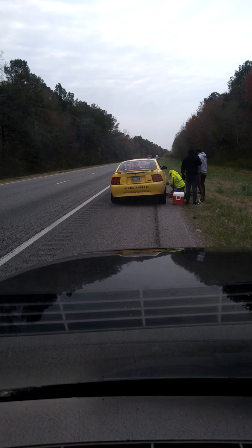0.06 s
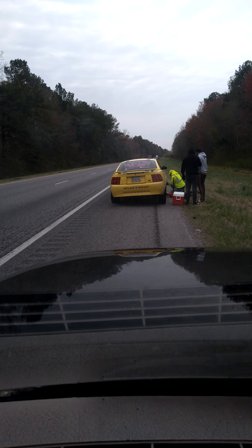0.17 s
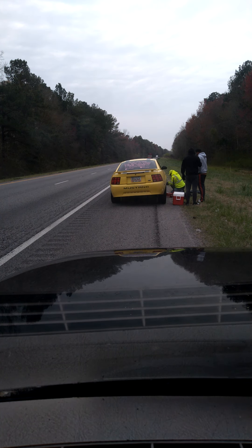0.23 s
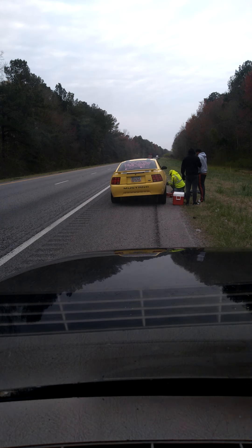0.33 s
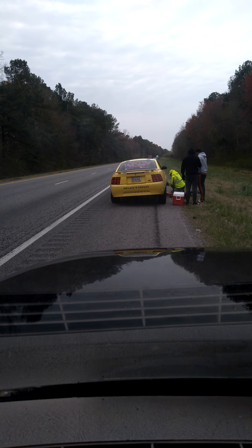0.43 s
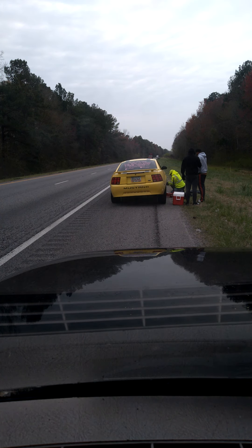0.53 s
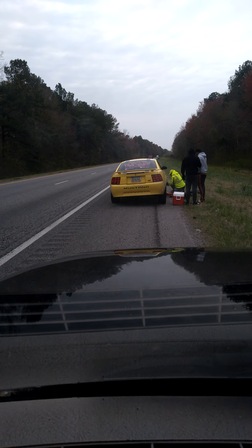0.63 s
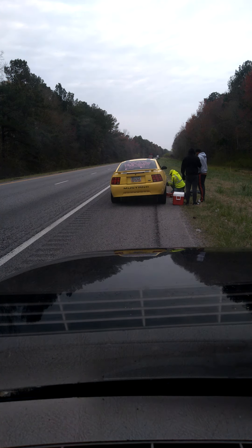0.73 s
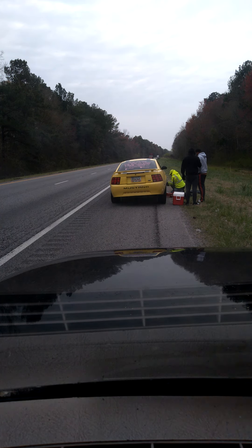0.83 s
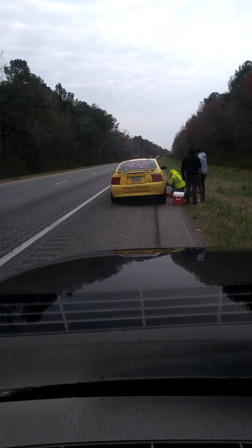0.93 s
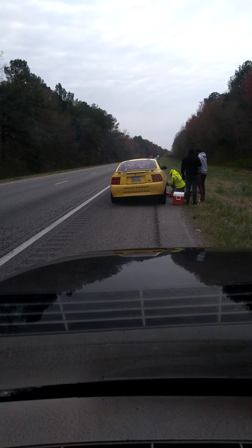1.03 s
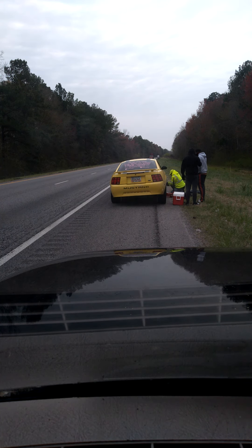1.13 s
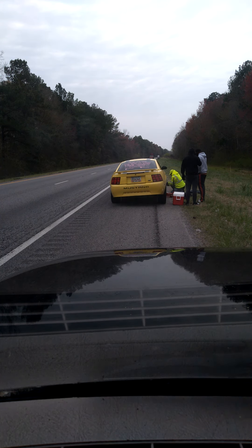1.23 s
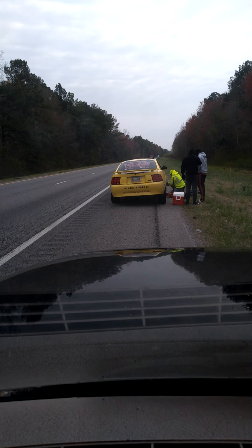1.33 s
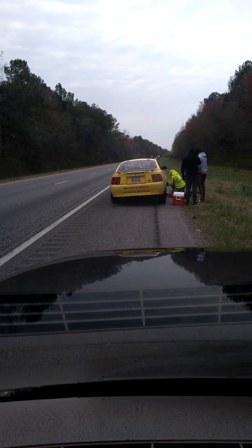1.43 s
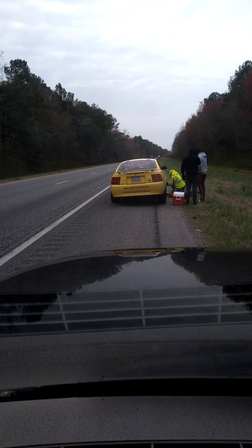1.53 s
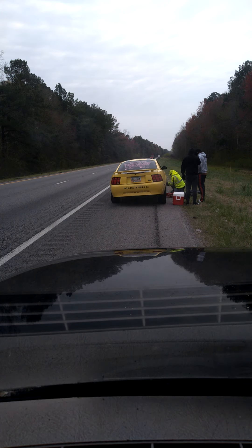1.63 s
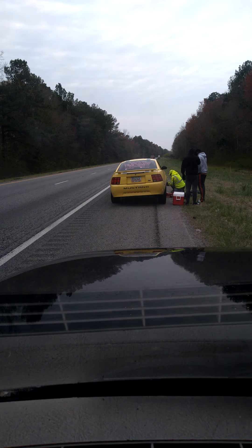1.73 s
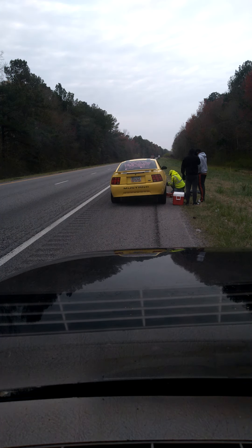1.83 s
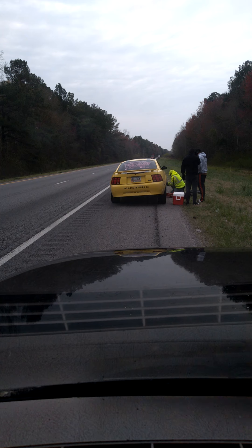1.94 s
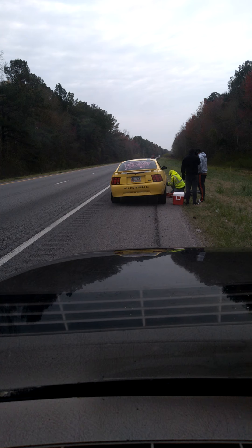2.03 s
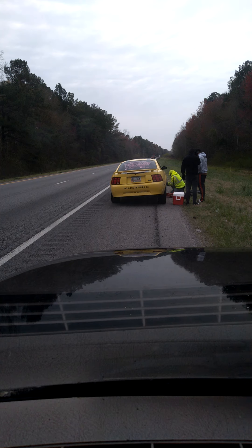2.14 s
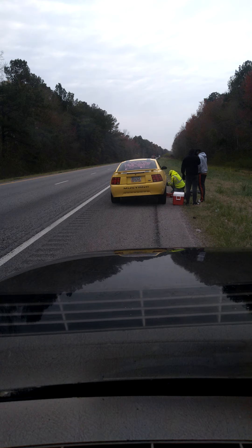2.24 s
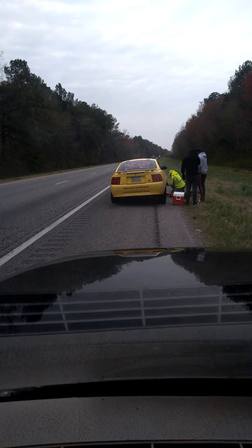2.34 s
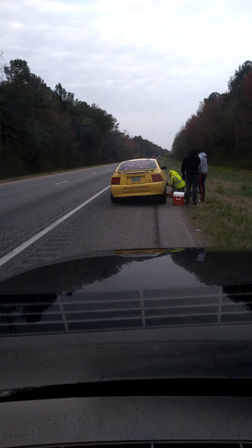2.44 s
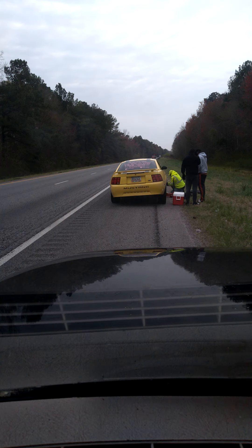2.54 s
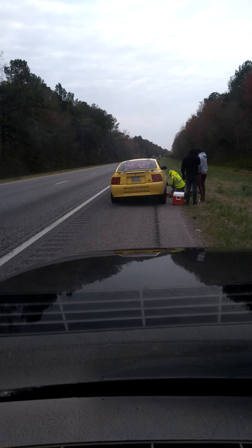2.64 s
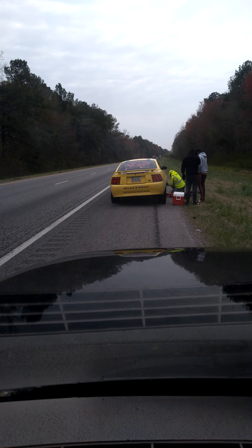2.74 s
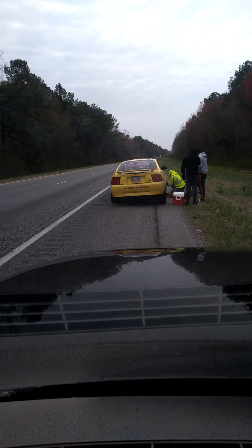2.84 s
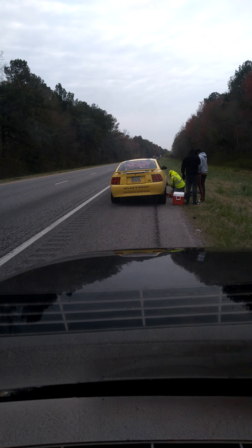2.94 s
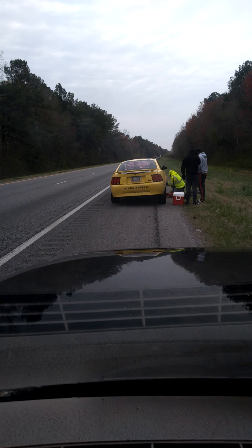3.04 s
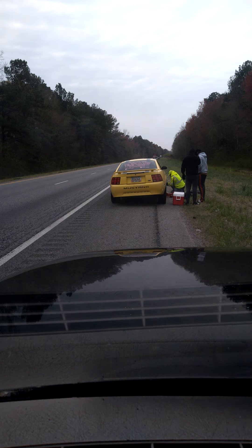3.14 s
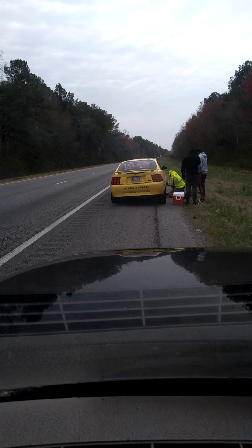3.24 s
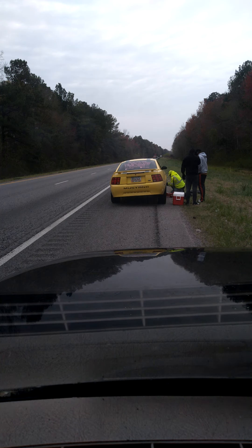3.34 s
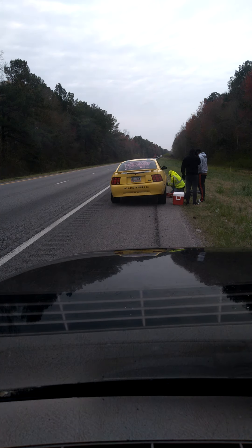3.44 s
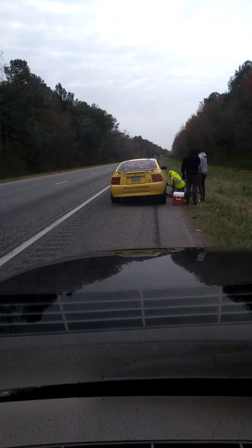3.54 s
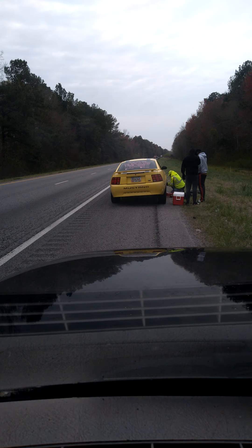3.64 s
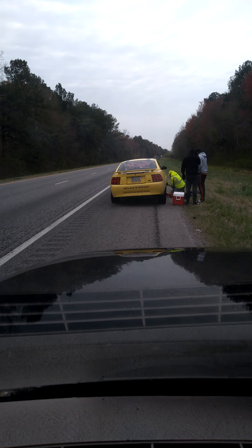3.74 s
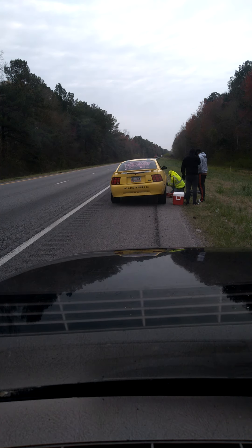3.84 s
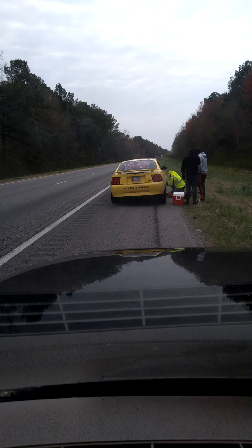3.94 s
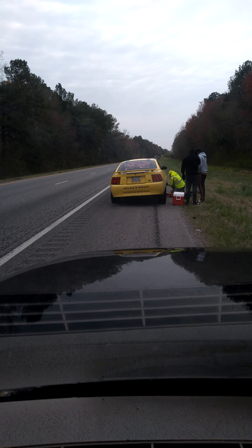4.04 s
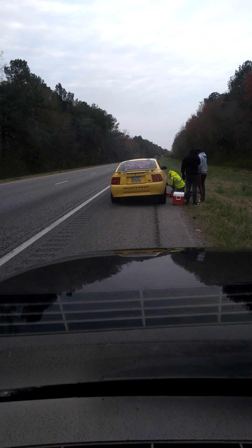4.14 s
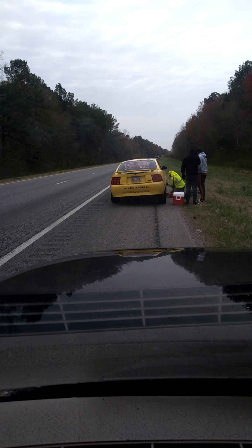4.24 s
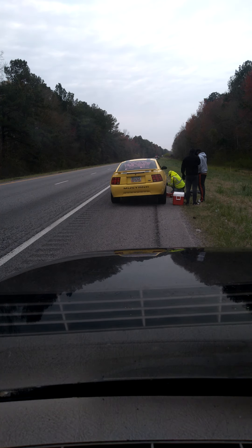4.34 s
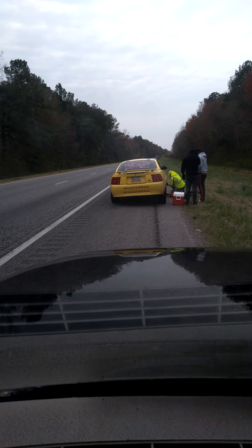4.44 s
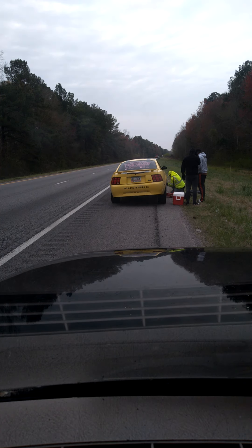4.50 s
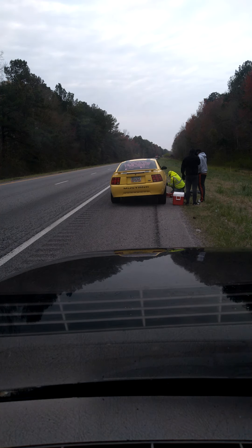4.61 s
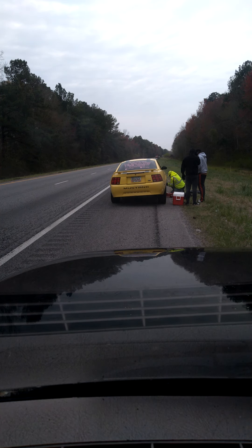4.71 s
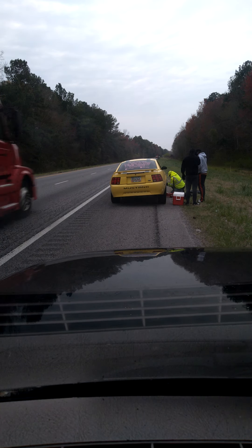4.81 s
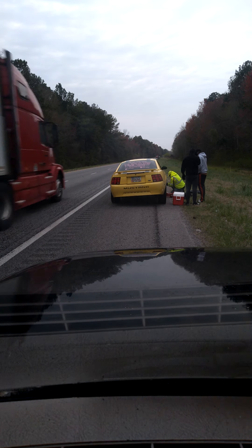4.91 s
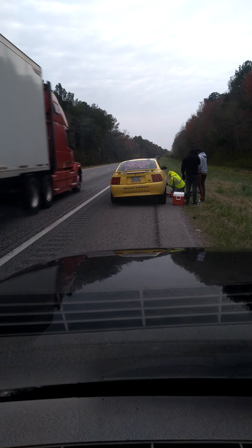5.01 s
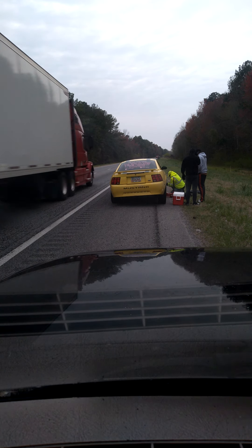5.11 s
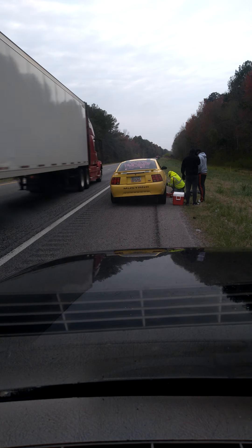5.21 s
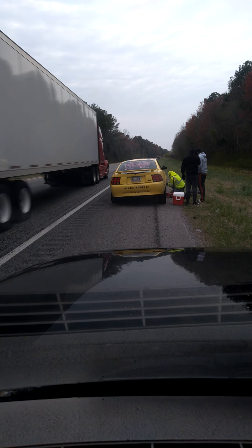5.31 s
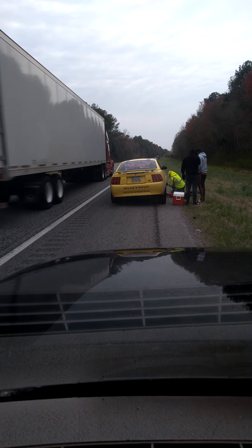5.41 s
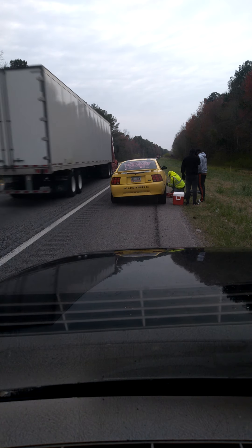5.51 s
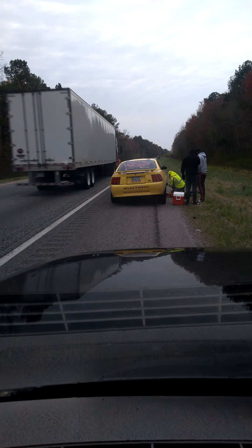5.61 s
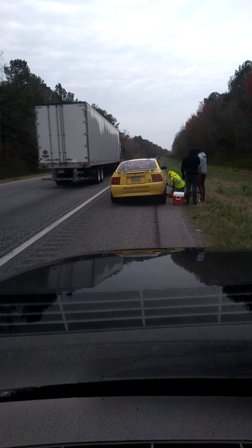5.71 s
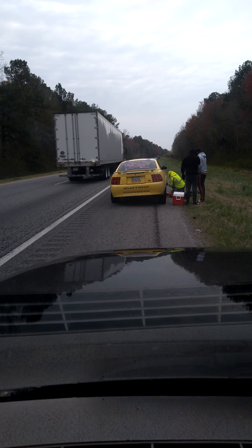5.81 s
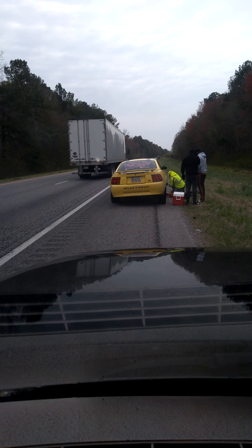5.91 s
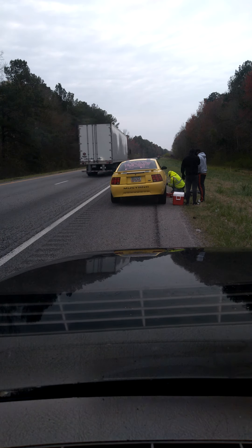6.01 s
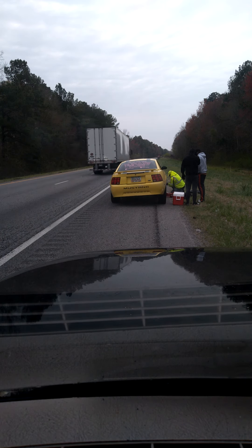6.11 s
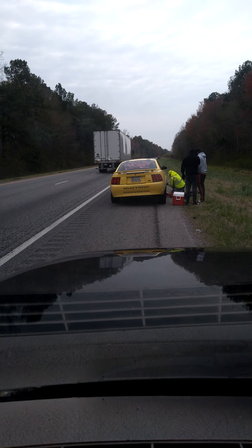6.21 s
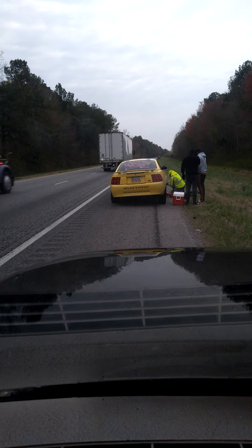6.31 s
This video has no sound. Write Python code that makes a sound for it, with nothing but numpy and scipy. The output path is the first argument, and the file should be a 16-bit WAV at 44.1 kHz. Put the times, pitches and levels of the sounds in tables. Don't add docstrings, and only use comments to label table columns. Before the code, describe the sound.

Hazard relay ticks and tocks inside a quiet parked car as the engine idles, then a truck and a second vehicle rush past booming.

```python
import sys
import numpy as np
from scipy import signal
from scipy.fft import rfft, irfft, next_fast_len
from scipy.io import wavfile
from scipy.ndimage import uniform_filter1d, map_coordinates

SR = 44100
rng = np.random.default_rng(int(sys.argv[2]) if len(sys.argv) > 2 else 0)


def file_out(sig):
    cols = np.atleast_2d(sig).T
    lim = np.clip(cols, -1, 1)
    pcm = np.round(lim * 32767).astype(np.int16)
    wavfile.write(sys.argv[1], SR, pcm)


def voltage_ratio(decibels):
    exponent = np.asarray(decibels, float) / 20
    return 10 ** exponent


N = 280476

# frequency in Hz, left-right correlation.
PORT_LIKENESS = [(60, 0.98), (170, 0.995), (330, 0.96), (600, 0.91), (900, 0.43), (1300, 0.75), (2000, 0.3),
                 (3000, 0.0089), (5000, 0)]
# frequency in Hz, lead of the left in radians.
PORT_LEAD = [(60, 0), (200, -0.1), (300, -0.42), (500, -0.35), (950, -.8), (1210, -2.5), (2070, -3)]
# frequency in Hz, level in dB per Hz.
IDLE_SPECTRUM = [(410, -51), (700, -28.5), (897, -22), (1020, -13), (1100, -30), (1230, -10), (1770, 2),
                 (1930, -3.5), (2820, -3), (4010, -8.5), (5490, -6), (6010, -5.5), (9610, -4),
                 (11500, -15.5), (15800, -33)]
# time in seconds, level in dB against the closest point.
WHEEL_NEARNESS = [(0, -42.5), (.7, -37.5), (1.5, -29), (2.1, -26), (2.8, -18.5), (3.5, -16), (3.95, -12.5),
                  (4.3, -6), (4.5, -0.5), (4.75, -0.5), (5.05, 0.5), (5.22, -3), (5.4, -9), (5.6, -3.5),
                  (5.83, 2), (6.0, -1.5), (6.3, -1), (6.36, -4)]


def unit(x):
    return x / np.sqrt(np.mean(x ** 2) + 1e-20)


def along(points, hz):
    f, v = np.transpose(points)
    return np.interp(np.log(hz + 1), np.log(f + 1), v)


def coloured(spectrum):
    return lambda hz: voltage_ratio(along(spectrum, hz))


def curves(rows):
    s, *cols = np.transpose(rows)
    return [np.interp(np.arange(N) / SR, s, c) for c in cols]


def fade(t0, t1):
    return np.clip((np.arange(N) / SR - t0) / (t1 - t0), 0, 1)


def soft_gate(start, end):
    edge_s = 0.33 * (end - start)
    return fade(start, start + edge_s) * fade(end, end - edge_s)


def voice(start, end, first_hz, last_hz, db):
    hz = first_hz + (last_hz - first_hz) * fade(start, end)
    return hz, voltage_ratio(db) * soft_gate(start, end)


def wobble(rate):
    knots = rng.standard_normal(int(N * rate / SR) + 4)
    return map_coordinates(knots, [np.arange(N) * rate / SR])


def filtered(x, response):
    m = next_fast_len(N + SR // 2)
    return irfft(rfft(x, m) * response(np.fft.rfftfreq(m, 1 / SR)), m)[..., :N]


def rush(gain, patchy_db):
    z = signal.stft(rng.standard_normal((2, N + 512)), nperseg=512)[2]
    patches = uniform_filter1d(rng.standard_normal(z.shape[1:]), size=5, axis=0)
    patches = uniform_filter1d(patches, size=10, axis=1)
    pair = signal.istft(z * voltage_ratio(patchy_db * unit(patches)), nperseg=512)[1][:, :N]

    def mid_side(hz):
        angle = np.arccos(np.clip(along(PORT_LIKENESS, hz), -1, 1)) / 2
        return gain(hz) * [np.cos(angle), np.sin(angle)]

    def lead(hz):
        return np.exp(1j * along(PORT_LEAD, hz) * [[.5], [-.5]])

    mid, side = filtered(pair, mid_side)
    return unit(filtered(np.array([mid + side, mid - side]), lead))


def bands(gain, edges_hz, levels_db, patchy_db):
    noise = rush(gain, patchy_db)
    below = lambda hz, edge_hz: 1 / (1 + (hz / edge_hz) ** 22)
    total = 0
    for lo, hi, db in zip(edges_hz, edges_hz[1:], levels_db):
        part = filtered(noise, lambda hz: below(hz, hi) - below(hz, lo) * (lo > edges_hz[0]))
        total = total + voltage_ratio(db) * unit(part)
    return total


def narrow(hz, width_hz):
    a, b = filtered(rng.standard_normal((2, 2, N)), lambda f: 1 / (1 + (2 * f / width_hz) ** 2))
    alike = np.clip(along(PORT_LIKENESS, hz[0]), 0, 1)
    left = a[0] + 1j * a[1]
    right = alike * left + np.sqrt(1 - alike ** 2) * (b[0] + 1j * b[1])
    right = right * np.exp(-1j * along(PORT_LEAD, hz[0]))
    carrier = np.exp(2j * np.pi * np.cumsum(hz) / SR)
    return unit(np.real(np.array([left, right]) * carrier))


def flasher(first_s, snap_db, knock_db, softer_db):
    beats = np.arange(first_s, N / SR, .7006)
    return [(s, snap_db - softer_db * (k == 0), knock_db + 1.3 * s) for k, s in enumerate(beats)]


def relay(contacts, box, snap_t60, thud_t60, thud_db, rise):
    # frequency in Hz, level in dB per Hz.
    snap_spectrum = [(1180, -53), (2000, -16.5), (2140, -18), (2590, -31), (3330, -6), (4870, -7),
                     (5350, -11), (8250, -3.5), (8990, -4.5), (9970, -1), (15800, -16)]
    # frequency in Hz, level in dB per Hz.
    thud_spectrum = [(400, -40), (560, -18), (700, -11), (850, -5), (1100, -2), (1400, 2), (1650, -5.5),
                     (2200, -10), (3500, -17)]
    snap, thud, ring = np.zeros(N + SR), np.zeros(N + SR), np.zeros((2, N + SR))
    t = np.arange(SR // 5) / SR
    onset = 1 - np.exp(-t / rise)
    swell = (1 - np.exp(-t / 0.0023)) ** 2
    side_rad = np.array([[0], [1.3]])
    for s, snap_db, knock_db in contacts:
        at = round((s - .001) * SR)
        span = slice(at, at + len(t))
        snap[span] += voltage_ratio(snap_db - 4.5 - 60 * t / snap_t60) * onset
        thud[span] += voltage_ratio(knock_db + thud_db - 60 * t / thud_t60) * onset
        for hz, mode_db, t60 in box:
            decay = voltage_ratio(knock_db + mode_db + 5.5 - 60 * t / t60)
            ring[:, span] += decay * swell * np.sin(2 * np.pi * hz * t + side_rad)
    snaps = snap[:N] * rush(coloured(snap_spectrum), patchy_db=1.5)
    thuds = thud[:N] * rush(coloured(thud_spectrum), patchy_db=1.3)
    return snaps + thuds + ring[:, :N]


def hazard_relay():
    # frequency in Hz, level in dB, t60 in seconds.
    tick_box = [(1318, 5, 0.031), (1070, -8, 0.056), (946, -9, 0.053), (600, -9, 0.055), (4750, -4, 0.036),
                (3890, -13, 0.033)]
    # frequency in Hz, level in dB, t60 in seconds.
    tock_box = [(800, -3, 0.053), (870, -1, 0.067), (1100, -2, 0.073), (1290, -6, 0.042), (1545, -2, 0.061)]
    closing = flasher(first_s=.0893, snap_db=-29, knock_db=-44.5, softer_db=8.3) + [(5.4166, -24, -43)]
    opening = flasher(first_s=.4558, snap_db=-35.5, knock_db=-50, softer_db=7.5) + [(.4955, -47, -64)]
    ticks = relay(closing, tick_box, snap_t60=0.105, thud_t60=0.12, thud_db=-3.0, rise=0.00098)
    tocks = relay(opening, tock_box, snap_t60=.14, thud_t60=0.22, thud_db=3.5, rise=0.0022)
    return ticks + tocks


def engine():
    # frequency in Hz, level in dB per Hz.
    injector_spectrum = [(2000, -31), (2800, 1.5), (3600, -16), (5500, -7), (7500, -8), (9700, -4.5),
                         (10600, -8.5), (11500, -0.5), (12500, -9), (14000, -12.5), (15800, -21)]
    hiss_db, hiss_rise_db_per_s, click_db = -50, 1.73, -48.5
    t = np.clip(np.arange(N) / SR - .8, -.1, None)
    warm_db = -8 * np.exp(-(t + .1) / .091) + 1.8 * soft_gate(.85, 1.5)
    stroke = 32.01 + 40.05 * t - .075 * t ** 2
    count = stroke.astype(int)
    size_db = 1.6 * rng.standard_normal(count.max() + 1)[count] - 1.2 * (count % 2)
    since_s = stroke % 1 / 40
    puff = voltage_ratio(size_db - 60 * since_s / 0.063) * (1 - np.exp(-since_s / 0.00099))
    click_gain = voltage_ratio(click_db + .6 * t + warm_db / 2 + 7)
    clicks = click_gain * puff * rush(coloured(injector_spectrum), patchy_db=1.5)
    hiss_gain = voltage_ratio(hiss_db + hiss_rise_db_per_s * np.minimum(t, 3.1) + warm_db)
    hiss = hiss_gain * rush(coloured(IDLE_SPECTRUM), patchy_db=0.5)
    return fade(0.734, 0.737) * (clicks + hiss)


def road():
    road_edges_hz = [35, 140, 360, 540, 1050]
    # frequency in Hz, width in Hz, level in dB.
    cabin_modes = [(86.5, 40, 7), (175, 16, -2.5), (182, 22, -5), (220, 19, -4.5), (330, 39, 1),
                   (397, 15, -3), (444.5, 31, -3.5), (498.6, 27, -5.5), (612.5, 50, -3.5), (658, 27, -7),
                   (806, 60, -14.5), (959, 33, -15.5)]
    # frequency in Hz, level in dB per Hz.
    cabin_bed = [(15, -57), (25, 7), (81, 17.5), (128, 0), (225, 18.5), (541, -17.5), (618, 8.5),
                 (729, -25), (1300, -6), (1690, -54), (2860, -120)]
    # level when closest in dB, growth with nearness, far highway in dB.
    bodywork = [
        (-29.5, 1.01, -58),
        (-21.5, 0.99, -66),
        (-28, 1, -87),
        (-24.5, 1.24, -75.5),
    ]
    # start in seconds, end in seconds, more roar in dB,
    # more upper roar in dB.
    alongside = [
        (4.2, 5.22, 7.5, 4.5),
        (5.6, 6.8, 4.5, 0),
    ]

    def gain(f):
        modes = sum(voltage_ratio(2 * db) / (1 + (2 * (f - c) / w) ** 2) for c, w, db in cabin_modes)
        bed = voltage_ratio(2 * (along(cabin_bed, f) - 10.5))
        return np.sqrt(modes + bed) * (f / 52) ** 4 / (1 + (f / 52) ** 4)

    throb_db = 1.04 * wobble(45) + 0.53 * wobble(15)
    near_db, = curves(WHEEL_NEARNESS)
    slow_db = uniform_filter1d(near_db, int(0.81 * SR), mode="nearest")
    roar_db, upper_db = sum(np.outer(more, soft_gate(start, end)) for start, end, *more in alongside)
    upper_db = upper_db + 1.3 * np.minimum(near_db + 20, 0)
    nearness_db = [slow_db, near_db, near_db, near_db]
    more_db = [0, 0, roar_db, upper_db]
    flutter_db = [1.0 * wobble(4), 0.56 * throb_db, throb_db, throb_db]
    levels_db = []
    for (db, growth, far_db), n, more, flutter in zip(bodywork, nearness_db, more_db, flutter_db):
        power = voltage_ratio(2 * (db + growth * n + more)) + voltage_ratio(2 * far_db)
        levels_db.append(10 * np.log10(power) + flutter)
    return bands(gain, road_edges_hz, levels_db, patchy_db=-0.6)


def leak():
    leak_edges_hz = [1050, 2200, 4000, 7800, 16500]
    # frequency in Hz, level in dB per Hz.
    seal_spectrum = [(530, -32), (900, -11.5), (967, -8), (1130, -13.5), (1300, -5), (1520, -9),
                     (2080, -11.5), (2880, -9), (3200, -14.5), (4370, -16), (7960, -13), (9420, -13.5),
                     (10900, -18.5), (14800, -26), (15800, -33)]
    seal_bands_db = [1.5, -3, -2, -0.4]
    # closest time in seconds, lane distance over speed in seconds,
    # level in dB, tilt in dB a band.
    axle_passes = [(4.5, 0.2, -31.5, 0.03), (4.87, 0.14, -50, 4), (5.62, 0.075, -32, -3.5),
                   (5.84, 0.15, -26, -1.53), (6.08, .18, -36, 1.47)]
    t = np.arange(N) / SR
    powers = np.zeros((4, N))
    for s, lane_s, db, tilt_db in axle_passes:
        per_decade_db = np.where(t < s, 22.5, 29.5)
        loss_db = per_decade_db * np.log10(np.hypot(1, (t - s) / lane_s))
        for k in range(4):
            powers[k] += voltage_ratio(2 * (db + k * tilt_db - loss_db))
    levels_db = [band_db + 10 * np.log10(p) for band_db, p in zip(seal_bands_db, powers)]
    return fade(2.45, 4.0) * bands(coloured(seal_spectrum), leak_edges_hz, levels_db, patchy_db=0.95)


def passing_tones():
    # start in seconds, end in seconds, first Hz, last Hz, level in dB.
    exhaust_notes = [(4.85, 5.75, 95.5, 95.6, -29), (5.75, 6.15, 93, 87.5, -22.5),
                     (6.0, 6.6, 83.5, 77.5, -28.5)]
    # start in seconds, end in seconds, first Hz, last Hz, level in dB.
    seal_whistles = [(5.5, 5.9, 8700, 9200, -37), (5.65, 6.45, 9050, 9750, -31)]
    # start in seconds, end in seconds, first Hz, last Hz, level when closest in dB.
    tread_whines = [(3, 4.7, 1915, 1870, -37), (4.0, 4.65, 1880, 1780, -39), (4.63, 4.78, 1765, 1750, -32),
                    (1.9, 2.8, 1525, 1515, -38), (5.3, 6.05, 1530, 1600, -32), (5.5, 6.0, 1340, 1320, -36),
                    (5.5, 6.33, 2850, 2560, -38.5), (5.86, 6.02, 3460, 3380, -40),
                    (5.5, 6.3, 5480, 5720, -42), (2.7, 3.9, 4500, 4515, -44), (2.6, 4.1, 5300, 5310, -42),
                    (3.5, 4.4, 408, 402, -31.5), (4.5, 4.8, 400, 395, -24), (4.5, 5.4, 319, 339, -26),
                    (5.68, 7.2, 174, 170, -24), (0.8, 3.52, 197, 194, -27.5), (1.05, 1.55, 330, 325, -25.5),
                    (5.5, 6.1, 965, 950, -36), (-.4, 0.72, 8450, 8450, -45)]
    note = whistle = whines = 0
    for row in exhaust_notes:
        hz, gain = voice(*row)
        note = note + gain * np.sqrt(2) * np.sin(2 * np.pi * np.cumsum(hz) / SR)
    for row in seal_whistles:
        hz, gain = voice(*row)
        whistle = whistle + gain * narrow(hz, width_hz=1050)
    for row in tread_whines:
        hz, gain = voice(*row)
        whines = whines + gain * narrow(hz, width_hz=12 + 0.019 * hz[0])
    near_db, = curves(WHEEL_NEARNESS)
    return note + whistle + voltage_ratio(0.89 * near_db) * whines


def cabin_air():
    # frequency in Hz, level in dB per Hz.
    vent_spectrum = [(290, -42.5), (500, -55), (603, -22), (794, -9.5), (1190, -3.5), (1460, -4.5),
                     (1810, 4.5), (2060, -11), (2380, -9), (2630, -10), (2870, -10), (4000, -16),
                     (8350, -18), (10800, -34), (15800, -46)]
    vent_db, vent_rise_db_per_s = -60, 2
    pump_db, pump_rise_db_per_s, pump_s = -60.5, 2.17, 0.44
    t = np.arange(N) / SR
    vent = voltage_ratio(vent_db + vent_rise_db_per_s * t) * rush(coloured(vent_spectrum), patchy_db=2.0)
    pump_gain = voltage_ratio(pump_db + pump_rise_db_per_s * t) * fade(pump_s, pump_s + 0.027)
    return vent + pump_gain * rush(coloured(IDLE_SPECTRUM), patchy_db=-1.5)


def scene():
    return hazard_relay() + engine() + road() + leak() + passing_tones() + cabin_air()


def roll_off(x):
    return signal.sosfilt(signal.butter(12, 15910, fs=SR, output="sos"), x)


def record(dry):
    # frequency in Hz, left over right in dB.
    port_balance = [(60, 0.5), (300, 0.5), (600, 0.2), (800, -1), (1170, -5), (1790, 2.5), (2740, 0),
                    (4190, 0.5), (6410, 2.5), (8200, -2), (9600, -9.5), (11500, 0.5), (15000, 5)]
    knots = rng.standard_normal((2, 400))

    def ports(hz):
        ripple = np.array([np.interp(hz / 60, np.arange(400), k) for k in knots])
        ripple_db = 1.6 * ripple * np.clip(hz / 1500 - .5, 0, 1)
        balance_db = along(port_balance, hz) * [[.5], [-.5]]
        return voltage_ratio(balance_db + ripple_db) * (hz < 15880)

    return roll_off(filtered(dry, ports))


dry = scene()
out = record(dry)
file_out(out)
```